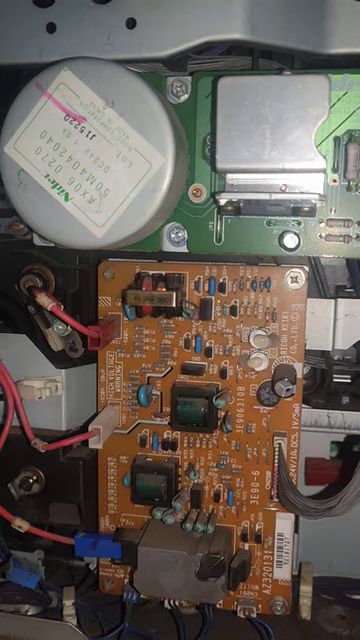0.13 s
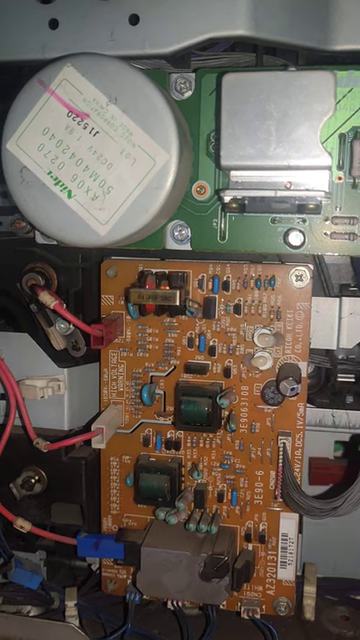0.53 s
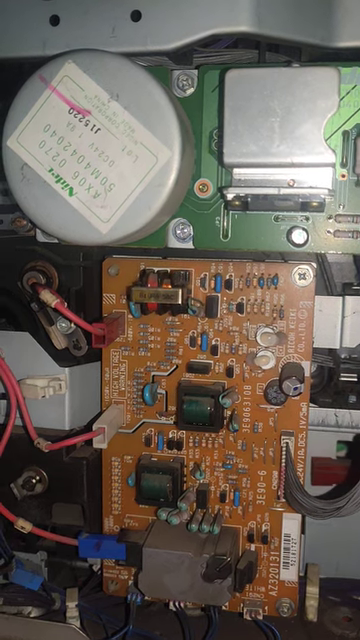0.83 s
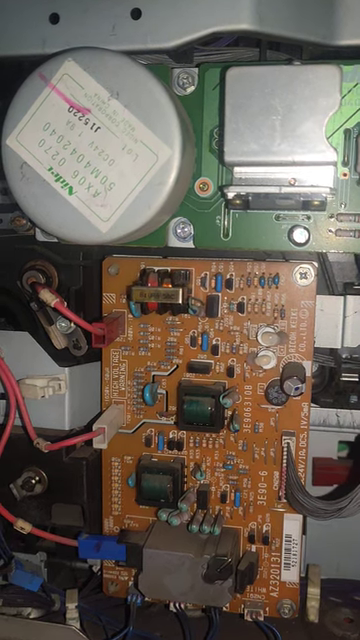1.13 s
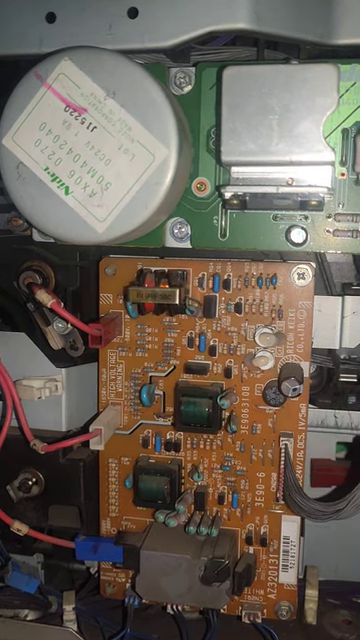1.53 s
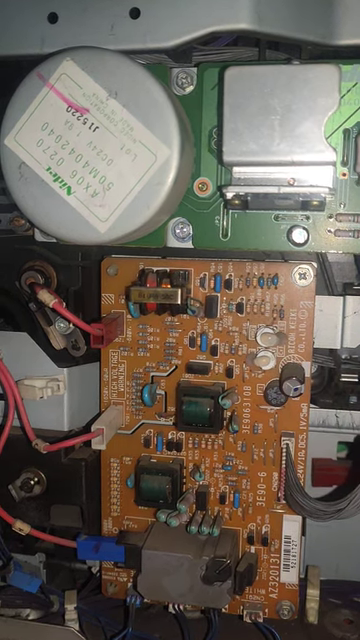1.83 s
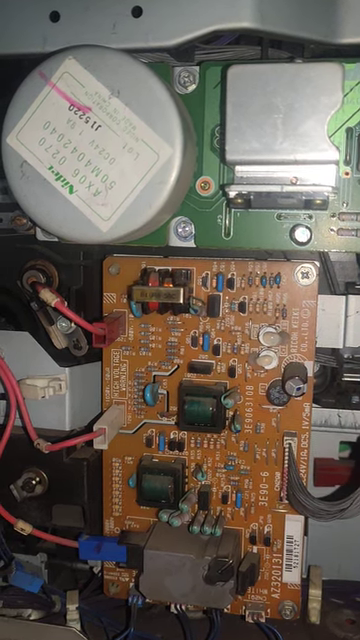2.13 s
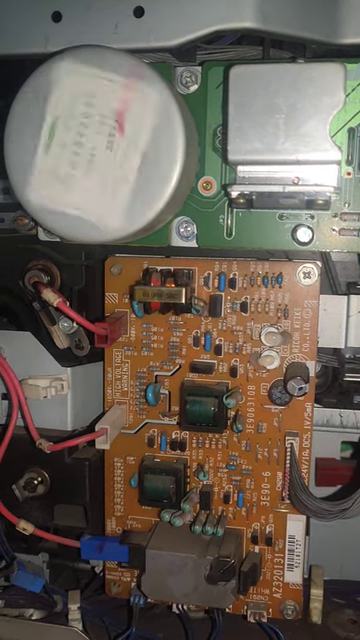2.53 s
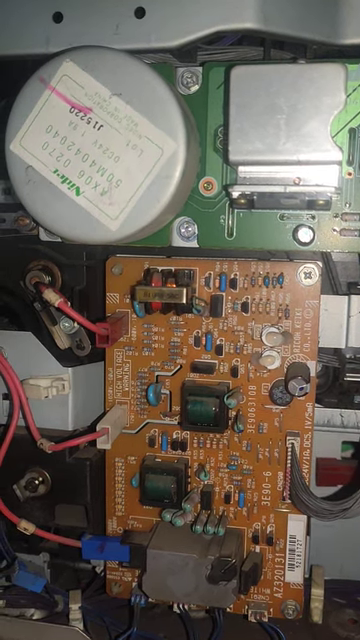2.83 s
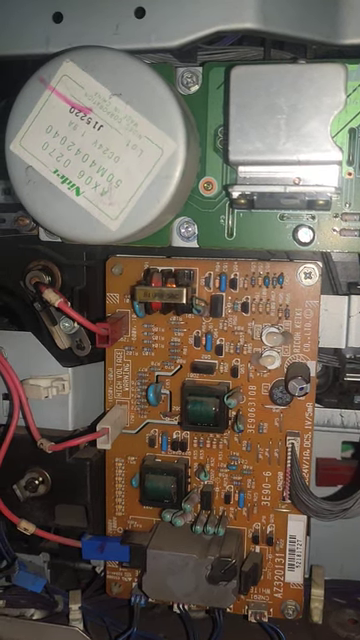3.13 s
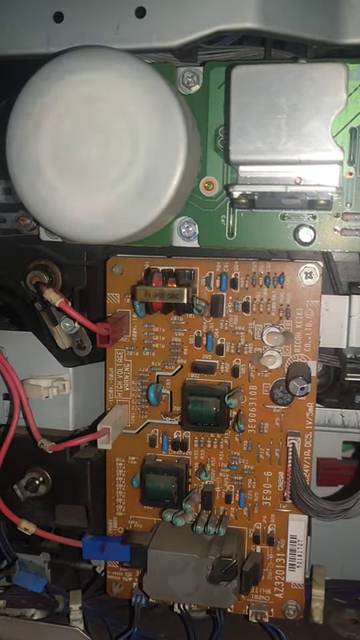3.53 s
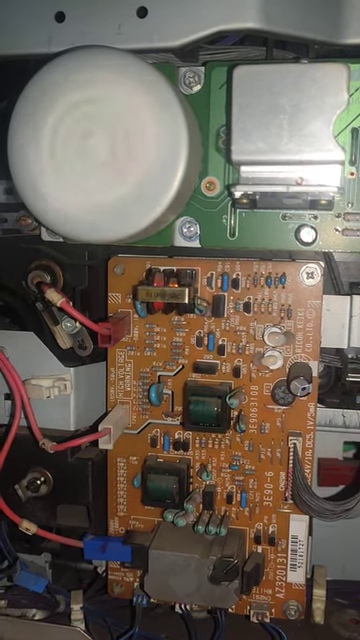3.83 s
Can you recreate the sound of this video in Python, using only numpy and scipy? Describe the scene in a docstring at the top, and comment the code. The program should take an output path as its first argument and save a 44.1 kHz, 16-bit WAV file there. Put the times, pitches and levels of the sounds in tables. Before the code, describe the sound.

An opened photocopier clunks and starts up, heard close over quiet room rumble. Faint whistles fall in pitch as rotors slow, with a soft low microphone bump at 1 second. Relays and gears clunk metallically at about 1.4 and 2.2 seconds, then sharply at 2.5. At 3.5 seconds the motor starts with another sharp clunk and whirs steadily with a thin squeal until the end at 4 seconds.

```python
"""An opened photocopier, heard close to its drive board in a small room.
Two rotors slow down with faint, paired falling whistles; a stepper and a motor driver hiss softly.
Relays, clutches and gears clunk and set the steel frame ringing. Near the end the main motor
starts, takes up its gears and runs with a steady whir and a thin squeal.
Under it all the room rumbles and hisses, and a hand nudges the microphone once."""
import sys
import numpy as np
from scipy import signal
from scipy.fft import rfft, irfft
from scipy.io import wavfile

SR = 44100
rng = np.random.default_rng(int(sys.argv[2]) if len(sys.argv) > 2 else 0)


def dump_mix(stems):
    """Bounce the given channels to the path in sys.argv[1] as a 16-bit WAV at rate SR."""
    frames = np.atleast_2d(stems).T  # one column per channel
    limited = np.clip(frames, -1, 1)  # hard clip at full scale
    pcm = np.round(limited * 32767).astype(np.int16)
    wavfile.write(sys.argv[1], SR, pcm)


N = 176400
TIME = np.arange(N) / SR
MOTOR_START_S = 3.465

# Blows of relays, clutches and gears. Each row: start in seconds, five levels in dB (at 110, 330,
# 1000, 3000 and 7500 Hz), rise time in seconds, seconds for the crack to fade 60 dB, tail level in dB.
BLOWS = [(1.3876, -52, -52, -38, -46.5, -33, 0.0017, 0.034, -2.5),
         (1.3933, -54, -43.5, -52, -53, -27, 0.0011, 0.028, -14),
         (1.4447, -27.5, -40, -32, -39.5, -51, 0.0022, 0.057, -10.5),
         (2.171, -55, -47, -41.5, -49, -36.5, 0.0043, 0.05, -6),
         (2.1787, -37, -35, -41.5, -44, -36, 0.0016, 0.051, -10),
         (2.476, -31.5, -22.5, -25, -19, -19, 0.00066, 0.024, -19.5),
         (2.619, -58, -60, -35.5, -48.5, -66, 0.0027, 0.039, -15.5),
         (2.646, -58, -49.5, -45, -46.5, -56.5, 0.0019, 0.053, -15),
         (2.662, -60, -56, -58, -45.5, -55.5, .002, 0.032, -26),
         (2.74, -64, -68, -49, -61, -74, .002, 0.032, -14),
         (3.4605, -51, -44.5, -41.5, -36.5, -47.5, .001, 0.041, -16),
         (3.470, -54, -43.5, -35.5, -45, -49, 0.0019, 0.035, -19),
         (3.5263, -48, -33, -38, -39, -37.5, .001, 0.021, -23),
         (3.546, -38, -54, -40, -37, -33, 0.0018, 0.035, -26),
         (3.549, -24, -27.5, -24, -22.5, -27.5, 0.00038, 0.025, -22)]
# How alike left and right sound. Each row: frequency in Hz, likeness (0 unrelated, 1 the same).
LIKENESS = [(40, 0.48), (150, 0.9), (400, 0.72), (900, 0.43), (1800, 0.0029), (4000, 0.021), (14000, 0)]
# Which side is louder. Each row: frequency in Hz, left minus right in dB.
BALANCE = [(100, 1.5), (400, -1.5), (700, 4), (1200, -0.5), (2200, -2.5), (3500, 0), (5000, -1), (6500, 6),
           (8200, 4), (12000, 0.5)]


def from_db(db):
    """Turn decibels into a gain."""
    return 10 ** (np.asarray(db) / 20)


def rms_one(x):
    """Scale a signal to an average power of 1."""
    return x / np.sqrt(np.mean(x ** 2) + 1e-20)


def in_time(rows):
    """Join rows of (seconds, value) into a curve with a value at every sample."""
    return np.interp(TIME, *np.transpose(rows))


def at_hz(points, hz):
    """Read between rows of (Hz, value), with octaves evenly spaced."""
    freqs, values = np.transpose(points)
    return np.interp(np.log(hz), np.log(freqs), values)


def pan(db):
    """Left and right gains, db apart, with the same total power for any db."""
    return rms_one(from_db([[db / 2], [-db / 2]]))


def drift(rate_hz):
    """A smooth random wander of typical size 1; a higher rate wanders faster."""
    step, warm_up = 40, 2000
    pole = np.exp(-2 * np.pi * rate_hz * step / SR)
    noise = rng.standard_normal(N // step + warm_up + 2)
    slow = signal.lfilter([1], [1, -2 * pole, pole * pole], noise)[warm_up:]
    return np.interp(np.arange(N) / step, np.arange(len(slow)), rms_one(slow))


def tone(hz, shift=0):
    """A sine wave that follows a pitch curve, shifted by an angle in radians."""
    return np.sqrt(2) * np.sin(2 * np.pi * (np.cumsum(hz) / SR + rng.random()) + shift)


def phase_gap(hz):
    """How far out of step left and right are, in radians: the less alike, the further."""
    return np.arccos(at_hz(LIKENESS, hz))


def spread_tone(hz, centre_hz):
    """A tone that reaches left and right out of step."""
    return tone(hz, phase_gap(centre_hz) * np.array([[.5], [-.5]]))


def ring(clicks, hz, t60):
    """Each click starts a sine wave that fades by 60 dB in t60 seconds."""
    decay = np.exp(-np.log(1000) / (t60 * SR))
    angle = 2 * np.pi * hz / SR
    return signal.lfilter([0, np.sin(angle)], [1, -2 * decay * np.cos(angle), decay ** 2], clicks + 1e-18)


def noise_bands():
    """Stereo noise in bands a third of an octave wide, each given with its centre in Hz."""
    edges = 20 * 2 ** (np.arange(30) / 3)
    white = rng.standard_normal((2, 2, N))
    for k, (low, high) in enumerate(zip(edges, edges[1:])):
        band_pass = signal.butter(2, [low, high], "band", fs=SR, output="sos")
        mid, side = signal.sosfilt(band_pass, white[k % 2])
        hz = np.sqrt(low * high)
        alike = at_hz(LIKENESS, hz)
        stereo = np.sqrt(1 + alike) * mid + np.sqrt(1 - alike) * side * [[1], [-1]]
        yield hz, pan(at_hz(BALANCE, hz)) * stereo


def coloured(spectrum, flicker_db):
    """Stereo noise shaped by a spectrum, each band flickering on its own."""
    return rms_one(sum(band * from_db(at_hz(spectrum, hz) + flicker_db * drift(14.4))
                       for hz, band in noise_bands()))


def room():
    """The quiet rumble and hiss of the room."""
    # Each row: frequency in Hz, relative level in dB.
    spectrum = [(15, -15), (25, 4.5), (60, -7.5), (82, -15.5), (244, -6), (318, -17), (802, -22.5),
                (892, -24.5), (1050, -25), (1470, -30), (1730, -27.5), (1970, -36), (2570, -23),
                (2940, -36), (3440, -33), (3930, -33.5), (14000, -42)]
    return from_db(-59) * coloured(spectrum, flicker_db=2)


def coasting_rotors():
    """Two rotors of nearly equal speed slow down; their paired whistles swell at housing resonances."""
    # The slowing down that both share. Each row: time in seconds, speed in Hz.
    speed_curve = [(.08, 746), (.35, 691), (.8, 609), (1.25, 534), (1.65, 471), (2.05, 415), (2.36, 372),
                   (2.87, 314), (3.25, 271), (4.0, 195)]
    # Each row: multiple of the speed, relative level in dB, change in dB per second.
    whistles = [(2, -13, 4), (4, -7, 2.5), (4.1, 4.5, -8), (5.11, 4.5, -7.5), (5.21, 3, -6.5),
                (8, -9.5, 2.5), (8.1, -1, -2.5)]
    # The housing's resonances. Each row: frequency in Hz, boost in dB.
    housing = [(900, -16.5), (1250, -8), (1370, -3), (1480, 7), (1660, 5.5), (1770, 1.5), (1880, -2),
               (2000, -13.5), (2170, 0), (2350, -5), (2440, -1), (2530, 5), (2620, -6.5), (2850, -14),
               (3000, -12), (3130, -3.5), (3400, -9), (3800, -9.5), (4300, -11), (4900, -7.5), (5400, -15),
               (6000, -28)]
    base_db, flutter_db = -75.5, 4.5
    speed, out = in_time(speed_curve), 0
    for multiple, db, slope in whistles:
        hz = multiple * speed
        whistle = spread_tone(hz, hz.mean())
        level_db = base_db + db + slope * TIME + at_hz(housing, hz) + flutter_db * drift(11)
        out += whistle * from_db(level_db)
    return out


def soft_hisses():
    """A short stepper motor whir, a faint rustle and a high hiss from the motor driver."""
    # Each row: start and end in seconds, level in dB, centre in Hz, width in octaves.
    hisses = [(0.202, 0.294, -63.5, 3930, 0.4), (1.188, 1.28, -67.5, 1740, 0.91),
              (1.307, 1.348, -64.5, 2140, 0.88), (2.518, 2.995, -73.5, 7700, 0.058),
              (2.52, 2.995, -73.5, 8970, 1.7)]
    edge_s = 0.01
    hz, out = np.maximum(np.fft.rfftfreq(N, 1 / SR), 1), 0
    for start, end, db, centre, octaves in hisses:
        peak = 1 / (1 + (np.log2(hz / centre) / octaves) ** 2)
        hiss = rms_one(irfft(rfft(rng.standard_normal((2, N))) * peak, N))
        gate = np.clip(np.minimum(TIME - start, end - TIME) / edge_s, 0, 1)
        out += from_db(db) * gate * hiss * pan(at_hz(BALANCE, centre))
    return out


def hand_on_microphone():
    """The hand holding the microphone makes a short rumble and one low bump."""
    # The rumble's swell. Each row: time in seconds, level in dB.
    swell = [(.87, -75), (.895, -45), (.97, -49.5), (1.02, -52), (1.13, -56.5), (1.3, -59.5), (1.5, -58),
             (1.7, -75)]
    # Its tone colour. Each row: frequency in Hz, relative level in dB.
    spectrum = [(22, 7), (30, 2.5), (50, -14.5), (90, -15.5), (200, -24), (500, -50), (2000, -71.5)]
    rumble = from_db(in_time(swell)) * coloured(spectrum, flicker_db=5)
    nudge = np.arange(N) == SR  # one second in
    return rumble + from_db(-43) * ring(nudge, hz=26.4, t60=0.4)


def blow_db(hz):
    """The strength of every blow at one frequency, in dB."""
    column_hz = (110, 330, 1000, 3000, 7500)
    return np.array([np.interp(np.log(hz), np.log(column_hz), row[1:6]) for row in BLOWS])


def clunks():
    """Each blow is a short crack of noise, then a longer tail from the cabinet and room."""
    # Tone colour of the whole clunk, its crack and its tail. Each row: frequency in Hz, boost in dB.
    colour = [(30, -49), (60, -30), (100, -15.5), (170, -5), (250, -1), (340, 0), (500, -2.5), (800, -4.5),
              (1500, 0), (2200, 3.5), (4000, 2), (5000, 0), (6500, 0), (8200, 4), (9600, -16.5),
              (14000, -14.5)]
    crack_boost = [(100, -10), (300, 12), (800, 7.5), (3000, 2.5)]
    tail_boost = [(100, 0.5), (300, 5.5), (600, 7), (1200, 2.5), (3000, -4.5), (7000, -7.5), (14000, -11)]
    # The tail's length. Each row: frequency in Hz, seconds to fade 60 dB.
    tail_t60 = [(100, .6), (300, 0.5), (1000, 0.38), (3000, 0.41), (7000, .33), (14000, 0.4)]
    build_cycles = 1.5  # so low notes take longer to build up
    start, *_, attack, crack_t60, tail_db = np.transpose(BLOWS)[:, :, None]
    coarse_time = TIME[::16]
    age, out = np.maximum(coarse_time - start, 0), 0
    for hz, band in noise_bands():
        rise = 1 - np.exp(-age / (attack + build_cycles / hz))
        crack = from_db(at_hz(crack_boost, hz) - 60 * age / crack_t60)
        tail = from_db(tail_db + at_hz(tail_boost, hz) - 60 * age / at_hz(tail_t60, hz))
        power = (from_db(blow_db(hz))[:, None] * rise) ** 2 * (crack ** 2 + tail ** 2)
        loudness = np.interp(TIME, coarse_time, np.sqrt(power.sum(axis=0)))
        out += band * from_db(at_hz(colour, hz) + 6) * loudness
    return out


def steel_frame():
    """The same blows make the steel frame ring at its own notes."""
    # Each row: pitch in Hz, relative level in dB, seconds to fade 60 dB.
    notes = [(174.6, -19, 0.38), (236, -19, 0.56), (343, -13.5, .24), (437, -21.5, .2), (523, -17, 0.22),
             (697, -22, 0.15), (836, -21, 0.18), (1160, -18, 0.071), (1810, -13, .04), (2092, -10, 0.057),
             (2320, -17.5, 0.089), (3160, -1.5, 0.038), (4740, -7, 0.027), (6100, -15, 0.051),
             (6670, -13, .05), (6960, -13, .05), (10320, -27, .08)]
    hits, out = (np.array(BLOWS)[:, 0] * SR).astype(int), 0
    for hz, db, t60 in notes:
        strength = from_db(db + blow_db(hz) + rng.normal(0, 2.2, len(hits)))
        right_delay = int(phase_gap(hz) / (2 * np.pi * hz) * SR)
        clicks = np.zeros((2, N))
        clicks[0, hits] = clicks[1, hits + right_delay] = strength
        out += pan(at_hz(BALANCE, hz)) * ring(clicks, hz, t60)
    return out


def motor():
    """The motor spins up and holds its speed: it hums, its gears sing and their meshing teeth whir."""
    # Each row: multiple of the motor's pitch, level in dB, left minus right in dB.
    hum_tones = [(2.018, -58, -2), (3.974, -49.5, 0.5), (6.01, -59, 10), (7, -70, 13), (7.96, -61.5, 2),
                 (8.92, -70, -1), (10, -61.5, -10), (10.8, -70, 0), (12, -61.5, 16), (13.8, -65, 4),
                 (15.3, -67, -11), (18, -64, -8), (22.04, -59.5, -5), (29.4, -62.5, -4)]
    # Gears and mounts. Each row: pitch at full speed in Hz, level in dB, left minus right in dB.
    gear_tones = [(106.8, -62, 5), (156, -61, 0), (234.6, -62.5, -2), (308, -53, 1), (385, -74, 12),
                  (538, -66, -3), (673, -57, 26), (1356, -65, 8)]
    # Each row: frequency in Hz, relative level in dB.
    whir_spectrum = [(30, -36), (80, -18), (125, -8), (170, -5), (250, -6), (330, -5), (440, -9.5),
                     (560, -3.5), (800, -12), (1150, -9.5), (1400, -11.5), (1750, -15.5), (2200, -12.5),
                     (2900, -15.5), (3600, -16.5), (4200, -17.5), (5200, -20.5), (6200, -23), (7700, -21),
                     (8500, -36), (9600, -52), (11500, -32), (14000, -41)]
    # Each row: time in seconds, level in dB.
    whir_level = [(3.46, -74), (3.485, -46.5), (3.53, -41.5), (3.58, -42.5), (3.64, -45.5), (3.8, -46),
                  (4.0, -46)]
    motor_hz, spin_up_s, full_load_s = 140.15, .022, 3.56
    motor_wobble, gear_wobble, tooth_depth = 0.0013, 0.0044, 0.165
    age = np.maximum(TIME - MOTOR_START_S, 0)
    speed = 1 - np.exp(-age / spin_up_s)
    load = np.minimum(age / (full_load_s - MOTOR_START_S), 1) ** 2
    pitch = motor_hz * speed * (1 + motor_wobble * drift(14))
    hum = gears = 0
    for multiple, db, side in hum_tones:
        gain = pan(side) * from_db(db + drift(12))  # flutters by about 1 dB
        hum += gain * spread_tone(multiple * pitch, multiple * motor_hz)
    for hz, db, side in gear_tones:
        gain = pan(side) * from_db(db + drift(14))
        gears += gain * spread_tone(hz * speed * (1 + gear_wobble * drift(17)), hz)
    whir = coloured(whir_spectrum, flicker_db=0.94) * from_db(in_time(whir_level)) * (age > 0)
    tooth_pulse = 1 + tooth_depth * tone(pitch)
    return load * (hum + gears) + whir * tooth_pulse


def mount_shudder():
    """The motor's mount shudders once as the load comes on."""
    # Each row: pitch in Hz, level in dB, seconds to fade 60 dB.
    notes = [(115.3, -41, 0.37), (173.3, -44, 0.36), (238.7, -42, 0.29), (307, -37.5, 0.28),
             (432, -48.5, 0.18)]
    jolt = np.arange(N) == int(3.565 * SR)
    return sum(from_db(db) * ring(jolt, hz, t60) for hz, db, t60 in notes)


def squeal():
    """The loaded drive gives a thin rasping whine, with a softer octave above it on the left."""
    # Each row: time in seconds, pitch in Hz.
    pitch_curve = [(3.57, 3955), (3.63, 3946), (3.8, 3946), (4.0, 3895)]
    # Each row: time in seconds, level in dB.
    level_curve = [(3.55, -80), (3.59, -48.5), (3.645, -45.5), (3.7, -50), (3.77, -52), (3.83, -58),
                   (3.9, -51), (3.94, -59), (4.0, -61)]
    jitter, rasp = .008, 0.32
    hz = in_time(pitch_curve) * (1 + jitter * drift(139))
    whine = spread_tone(hz, hz.mean())
    octave = from_db(-6.5) * pan(14) * tone(2 * hz)
    loudness = from_db(in_time(level_curve)) * (1 + rasp * drift(55))
    return (whine + octave) * loudness * (TIME > MOTOR_START_S)


def scene():
    """The whole machine in its room."""
    machine = clunks() + steel_frame() + coasting_rotors() + motor() + mount_shudder() + squeal()
    return machine + soft_hisses() + hand_on_microphone() + room()


def record(dry):
    """Fade the sound in and cut the treble above 14400 Hz."""
    # Each row: time in seconds, gain in dB.
    fade_in = [(.06, -49), (.085, -8), (.17, -5), (.22, 1.5)]
    low_pass = signal.ellip(12, .2, 80, 14400, fs=SR, output="sos")
    return signal.sosfilt(low_pass, dry * from_db(in_time(fade_in)))


dry = scene()
out = record(dry)
dump_mix(out)
```